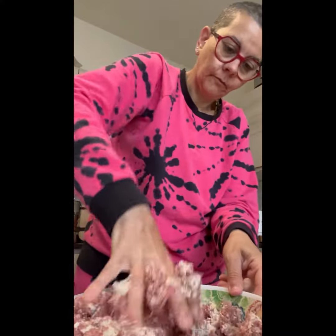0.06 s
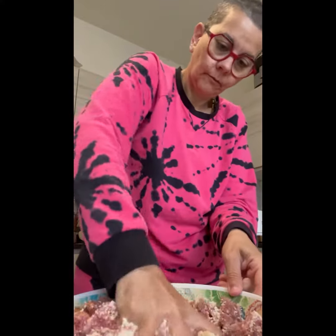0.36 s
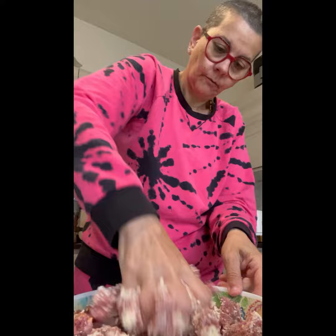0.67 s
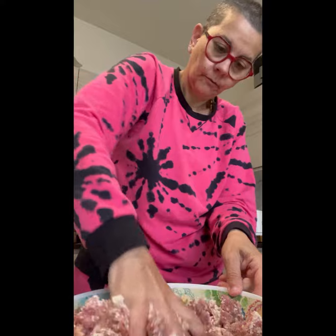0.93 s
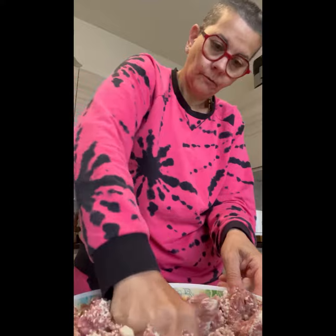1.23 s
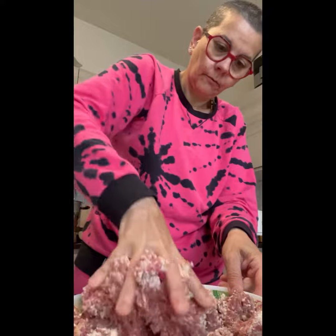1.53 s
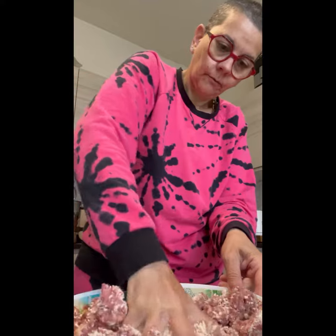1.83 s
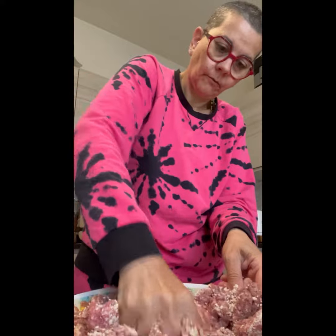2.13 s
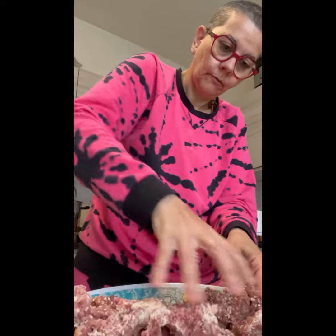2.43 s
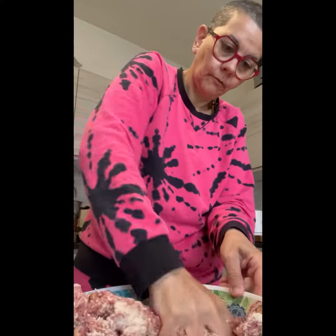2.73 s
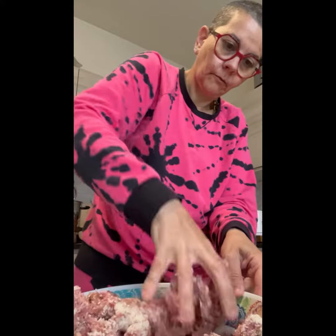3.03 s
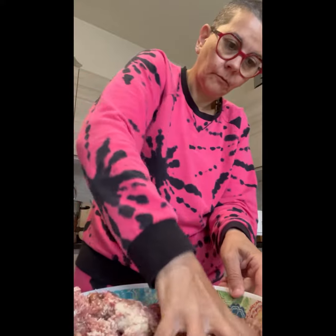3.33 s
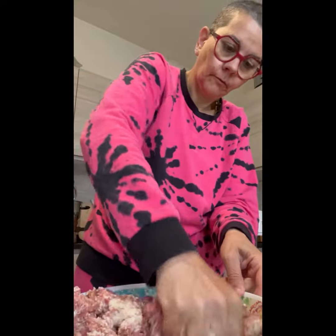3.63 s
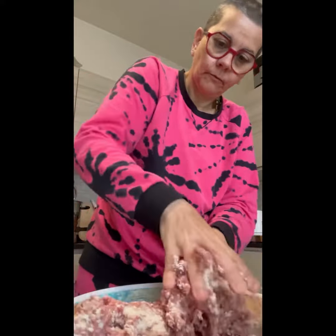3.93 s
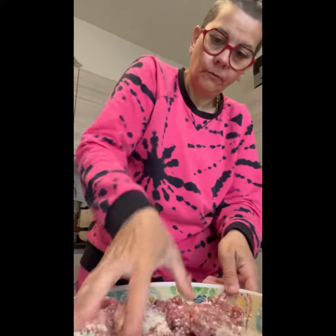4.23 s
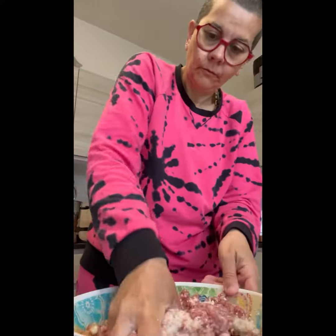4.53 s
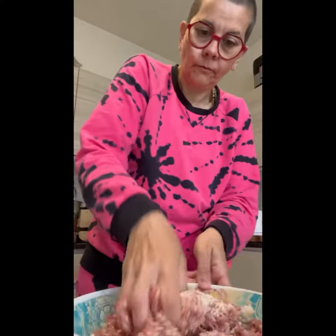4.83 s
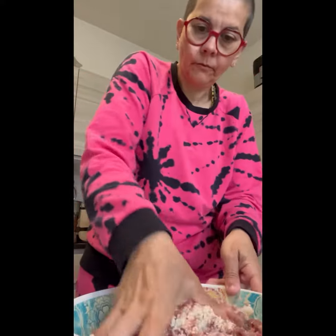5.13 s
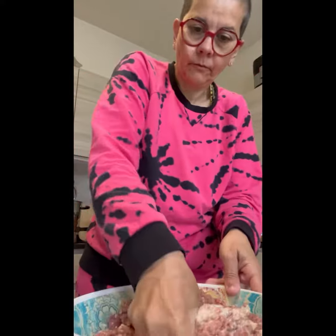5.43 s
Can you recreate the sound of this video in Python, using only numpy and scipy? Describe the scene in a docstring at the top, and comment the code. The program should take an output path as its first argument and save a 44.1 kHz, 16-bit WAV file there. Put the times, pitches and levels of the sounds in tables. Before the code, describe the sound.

A hand kneads wet minced meat in a bowl close to the microphone, over a steady low kitchen hum. The strokes begin at about 0.1, 0.9, 1.7, 2.5, 3.2, 4.2 and 5 seconds, each lasting roughly half a second. Each is a soft, low squelch with a sticky crackle and fine fizz that fades as the hand lifts. Small air pockets pop throughout, with a sharper snap at about 4.2 seconds and a cluster around 5.5. The meat falls back with soft, dull thuds, clearest near 2.9, 3.8 and 5 seconds. At about 4.8 seconds the bowl knocks hard on the counter, the loudest sound, with a brief rattle and a buzz of its rim. The kneading continues to about 5.6 seconds while a faint appliance whine swells behind it. The room adds only a slight, short echo.

```python
"""A kitchen counter, a phone's two microphone ports close to a bowl of wet minced meat.
Over the room's steady hum a hand kneads, each squeeze bursting thousands of tiny wet films.
Air pockets pop, the mass thuds back down, and the meat squishes stickily as it peels away.
Near 4.8 s the bowl knocks hard on the counter, its rim buzzing; a faint whine swells late on."""
import sys
import numpy as np
from scipy import signal
from scipy.fft import rfft, irfft
from scipy.io import wavfile
from scipy.ndimage import uniform_filter1d

SR = 44100
rng = np.random.default_rng(int(sys.argv[2]) if len(sys.argv) > 2 else 0)


def generate_wav(signal):
    """Clip the signal to [-1, 1] and save it as 16-bit WAV at the path in sys.argv[1]."""
    frames = np.transpose(np.atleast_2d(signal))
    scaled = np.clip(frames, -1, 1) * 32767
    pcm = np.round(scaled).astype(np.int16)
    wavfile.write(sys.argv[1], SR, pcm)


N = 250614
EDGE_HZ = 15900  # top of the microphone's band

# The kneading strokes. Each row: touch and lift of the hand in seconds; squeezing, peeling and
# smearing levels in dB; centre and half length in seconds and level in dB of a swell of fizz,
# heard only where it overlaps the stroke.
STROKES = [(-0.6, -0.1, -60, -65, -60, 0.5, .12, -59), (0.12, 0.636, -61, -61.5, -57, .63, 0.049, -59.5),
           (0.878, 1.362, -58, -61, -57, 0.6, 0.071, -51.5),
           (1.658, 2.167, -58.5, -60, -61.5, 2, 0.081, -53.5),
           (2.514, 2.891, -59, -56, -57, 3, 0.098, -51.5), (3.228, 3.888, -57.5, -57, -64, 4, 0.41, -49.5),
           (4.232, 4.788, -57.5, -53.5, -54.5, 5, 0.22, -47),
           (5.03, 5.63, -58, -60.5, -64.5, 5.56, 0.2, -49.5)]


def gain_of(db):
    """Decibels to amplitude."""
    return 10 ** (np.asarray(db) / 20)


def unit_rms(x):
    """Scales to rms 1."""
    return x / np.sqrt(np.mean(x ** 2) + 1e-20)


def curve_at(points, hz):
    """Reads a curve on a log-frequency axis."""
    point_hz, value = np.transpose(points)
    return np.interp(np.log(hz + 1), np.log(point_hz + 1), value)


def add(mix, start_s, sound):
    """Mixes a sound in at start_s."""
    part = mix[round(start_s * SR):][:len(sound)]
    part += sound[:len(part)]


def delayed(x, delay_s):
    """Delays a sound, by fractions of a sample too."""
    return np.interp(np.arange(N) - delay_s * SR, np.arange(N), x, left=0)


def colour(x, spectrum):
    """Filters by a spectrum in dB."""
    return irfft(rfft(x) * gain_of(curve_at(spectrum, np.fft.rfftfreq(N, 1 / SR))), N)


def widen(pair):
    """Mid and side become left and right, nearly alike in the bass."""
    # How much the two ports differ. Each row: frequency in Hz, side gain in dB.
    side_spectrum = [(60, -23.5), (200, -17), (400, -7), (700, 0.5), (1300, -3.5), (3000, -6), (6000, -5),
                     (9000, -61), (15000, -18)]
    side = colour(pair[1], side_spectrum)
    return np.array([pair[0] + side, pair[0] - side])


def kitchen_hum(level_db=-56, waver_hz=5):
    """Behind the bowl, the kitchen's steady low noise and the wavering whines of an appliance."""
    # The hum's colour. Each row: frequency in Hz, relative level in dB.
    hum_spectrum = [(20, -24), (45, 3.5), (130, -4.5), (175, -8), (245, 0), (400, -12.5), (620, -16.5),
                    (1000, -16.5), (1350, -26.5), (1850, -35.5), (2350, -24), (2900, -36.5), (7000, -47),
                    (15500, -60)]
    # Faint whines. Each row: pitch in Hz, level in dB.
    whines = [(340, -70.5), (740, -77.5), (2262, -81)]
    t = np.arange(N) / SR
    noise = widen(unit_rms(colour(rng.standard_normal((2, N)), hum_spectrum)))
    waver = unit_rms(uniform_filter1d(rng.standard_normal(N), SR // 20))
    drift_cycles = waver_hz * np.cumsum(waver) / SR
    swell_db = np.interp(t, [0, 1.2, 4.1, 5], [-97, -69, -82, -62.5])
    tones = list(whines) + [(944, swell_db)]  # the clearest whine swells late on
    whine = sum(gain_of(db) * unit_rms(np.sin(2 * np.pi * (hz * t + drift_cycles))) for hz, db in tones)
    return gain_of(level_db) * noise + whine


def crackle(per_s, spread_db, cycles, clump_db, patch_db=0, pitches=32):
    """Tiny films burst in clumps; each rings briefly at its own pitch and place."""
    clumps = unit_rms(uniform_filter1d(uniform_filter1d(rng.standard_normal(N), 600), 200))
    bursts = (rng.random(N) < per_s / SR) * rng.choice([-1, 1], N)
    place = rng.standard_normal(N)
    pitch_index = rng.integers(0, pitches, N)
    # every 25 ms, each group of four neighbouring pitches takes a new level
    patches = rng.standard_normal((N // 1100 + 1, pitches))[np.arange(N) // 1100, pitch_index // 4]
    sizes = np.minimum(rng.exponential(1, N), 3.5)
    bursts = bursts * gain_of(spread_db * sizes + clump_db * clumps + patch_db * patches)
    mid_side = np.zeros((2, N))
    for k, hz in enumerate(np.geomspace(250, 15000, pitches)):
        clicks = bursts * (pitch_index == k)
        film = signal.iirpeak(hz, cycles, SR)
        mid_side += signal.lfilter(*film, np.array([clicks, clicks * place]) + 1e-12)
    return mid_side


def crest(age, rise_s, rise_db, fall_db_per_s):
    """A level in dB that climbs to 0 and then sinks steadily."""
    return -rise_db * np.maximum(1 - age / rise_s, 0) - fall_db_per_s * np.maximum(age - rise_s, 0)


def hand_efforts(touch_db_per_s=407, squeeze_off_db_per_s=94, peel_off_db_per_s=106):
    """Gains of squeezing, peeling and smearing over time; contact is made quickly and lost slowly."""
    stretch_s, stretch_db = 0.16, 21.5
    cling_peel_db, cling_smear_db, cling_db_per_s = -70.5, -68.5, 39
    t, gains = np.arange(N) / SR, np.zeros((3, N))
    for touch, lift, squeeze_db, peel_db, smear_db, swell_at, swell_s, swell_db in STROKES:
        early, late = np.maximum(touch - t, 0), np.maximum(t - lift, 0)
        age = np.clip(t - touch, 0, lift - touch)
        # the fingers sink in, then the mass yields
        sink_db = crest(age, rise_s=0.15, rise_db=8, fall_db_per_s=23.5)
        squeeze = squeeze_db + sink_db - squeeze_off_db_per_s * late
        # the sticky crackle builds from the touch until the hand lifts
        grip_db = crest(age, rise_s=0.64, rise_db=3.5, fall_db_per_s=2)
        peel = peel_db + grip_db - peel_off_db_per_s * late
        fizz_swell = gain_of(swell_db) * np.exp(-.5 * ((t - swell_at) / swell_s) ** 2)
        smear = 20 * np.log10(np.hypot(gain_of(smear_db), fizz_swell))
        # films stretch as the hand lifts, then give way faster and faster
        smear -= stretch_db * (late / stretch_s) ** 2
        # meat clinging to the lifted hand still crackles, dying away
        peel = np.maximum(peel, cling_peel_db - cling_db_per_s * late)
        smear = np.maximum(smear, cling_smear_db - cling_db_per_s * late)
        gains = np.maximum(gains, gain_of(np.array([squeeze, peel, smear]) - touch_db_per_s * early))
    return gains


def kneading():
    """Squeezing gives a low squelch, peeling a sticky crackle, smearing a fine fizz."""
    # The colours of the three wet grains. Each row: frequency in Hz, relative level in dB.
    squeeze_spectrum = [(60, 3), (130, 14), (230, 5.5), (400, 2), (650, -4), (1150, 1.5), (1800, -8.5),
                        (2400, -2.5), (3200, -27), (6000, -65)]
    peel_spectrum = [(1200, -36), (1900, -9), (2200, 3.5), (2500, 4.5), (3050, 1.5), (3900, 2), (5100, -6),
                     (8000, -14), (15000, -42)]
    smear_spectrum = [(1200, -1.5), (1800, -5), (2400, 0.5), (3500, 1), (5000, -0.5), (6600, 1.5),
                      (8200, -4.5), (10500, -1), (13000, -5), (15500, -2.5)]
    squeeze, peel, smear = hand_efforts()
    squelch = crackle(per_s=3800, spread_db=2, cycles=5.2, clump_db=2.5, patch_db=2)
    sticky = crackle(per_s=3500, spread_db=1.5, cycles=3.9, clump_db=2.5, patch_db=2)
    fizz = crackle(per_s=12000, spread_db=2, cycles=1, clump_db=2)
    return widen(gain_of(3.5) * squeeze * unit_rms(colour(squelch, squeeze_spectrum))
                 + peel * unit_rms(colour(sticky, peel_spectrum))
                 + gain_of(-3.5) * smear * unit_rms(colour(fizz, smear_spectrum)))


def finger_ticks(level_db=-82):
    """Stray films snap faintly on the fingers, even while the hand is lifted."""
    snaps = crackle(per_s=60, spread_db=2, cycles=1, clump_db=0)
    bright = signal.sosfilt(signal.butter(2, 6000, "high", fs=SR, output="sos"), snaps)
    return gain_of(level_db) * widen(unit_rms(bright))


def air_pops(snap=0.43, snap_ms=0.072, pitch_rise=0.011, spray_db=-14, spray_s=0.0009, tear_s=0.00006):
    """An air pocket snaps open, spits a tiny spray and rings briefly; the bowl's wall echoes it."""
    # The larger pockets. Each row: start in seconds, level in dB, pitch in Hz, ring time in ms.
    large_pops = [(.113, -47, 3500, 0.38), (.1245, -45, 4050, 0.52), (.144, -43.5, 3420, .5),
                  (.162, -34.5, 3120, 0.53), (.239, -39, 2100, 0.26), (.458, -41, 1130, 0.63),
                  (.48, -38, 1400, .3), (.6495, -38.5, 3200, 0.45), (.9275, -41, 990, 0.36),
                  (.9275, -39, 2700, 0.33), (.995, -37.5, 2500, 0.15), (1.074, -41, 1110, 1.1),
                  (1.134, -39, 3730, 0.79), (1.211, -35.5, 1000, 0.39), (1.211, -37.5, 3980, 0.38),
                  (1.479, -44.5, 5140, 0.16), (1.548, -48, 3940, .27), (1.642, -43.5, 5630, 0.49),
                  (1.843, -30.5, 1480, 0.26), (1.847, -34, 930, 0.48), (1.873, -34, 2400, 0.5),
                  (2.2845, -34.5, 2460, 0.73), (2.415, -36.5, 3260, 0.82), (2.480, -44, 3100, .4),
                  (2.626, -41, 1194, 2), (2.651, -42, 5100, 0.7), (2.688, -42, 2350, 0.39),
                  (2.761, -42, 1100, 0.46), (2.836, -41, 1280, 0.86), (2.916, -42.5, 1330, 1),
                  (3.1773, -46, 4800, 0.27), (3.178, -32.5, 3270, .8), (3.445, -49, 1090, 2.4),
                  (3.6115, -38, 3000, 0.33), (3.613, -42.5, 1010, 0.64), (3.630, -34, 6600, 0.22),
                  (3.884, -35, 3010, 0.57), (3.896, -32, 3460, 0.25), (3.977, -41, 5900, .15),
                  (4.1127, -37.5, 1690, 0.23), (4.2015, -41, 2670, 0.82), (4.211, -44, 3900, 0.71),
                  (4.2335, -20.5, 3970, 0.48), (4.234, -29.5, 1410, 0.19), (4.284, -37, 9000, 0.25),
                  (4.4845, -34, 3840, 1.25), (5.090, -37.5, 5170, 0.26), (5.155, -37, 10000, 0.39),
                  (5.2555, -35.5, 4060, 0.53), (5.2555, -38, 8300, .25), (5.435, -34, 1370, 1.2),
                  (5.435, -36.5, 3700, 0.4), (5.4445, -30.5, 1180, 0.72), (5.445, -29, 3480, 0.39),
                  (5.445, -28.5, 9900, 0.28), (5.46, -34, 4130, 0.4), (5.607, -32, 4380, 0.55),
                  (5.632, -33, 970, 0.5), (5.632, -34, 2970, 0.32), (5.632, -26, 6540, 0.17)]
    out, t = np.zeros(N), np.arange(900) / SR
    tear = t / tear_s - 4
    click = (1 - 2 * tear ** 2) * np.exp(-tear ** 2)
    spray_swell = t / spray_s * np.exp(1 - t / spray_s)
    pockets = list(large_pops) + small_pops()
    for (start, db, hz, ring_ms), noise in zip(pockets, rng.standard_normal((400, len(t)))):
        age = t / (ring_ms / 1000)
        phase = 2 * np.pi * np.cumsum(hz * (1 + pitch_rise * np.tanh(age - 1))) / SR
        envelope = np.exp(-age) * (1 - np.exp(-2 * age)) ** 2
        ring = envelope / envelope.max() * np.sin(phase)
        band = signal.butter(2, [.9 * hz, min(2.4 * hz, EDGE_HZ)], "band", fs=SR)
        spray = gain_of(spray_db) * unit_rms(signal.lfilter(*band, noise)) * spray_swell
        click_gain = snap * np.exp(-ring_ms / snap_ms)  # shorter pops click more
        add(out, start, gain_of(db) * (ring + spray + click_gain * click))
    return out + gain_of(-19) * delayed(out, 0.002)


def small_pops(per_s=45, above_db=14, spread_db=2.5, hz=2400, octaves=0.71, ring_ms=0.33, count=300):
    """Rows of small pockets bursting at random under the hand, louder the harder it squeezes."""
    rows, squeeze = [], hand_efforts()[0]
    starts = rng.exponential(1, count).cumsum() / per_s
    scatter = np.clip(rng.standard_normal((count, 2)), -2, 2)
    for start, (size, pitch) in zip(starts, scatter):
        if any(touch < start < lift for touch, lift, *_ in STROKES):
            squeeze_db = 20 * np.log10(squeeze[min(round(start * SR), N - 1)])
            ratio = 2 ** (octaves * pitch)  # low ones ring longer
            rows.append((start, squeeze_db + above_db + spread_db * size, hz * ratio, ring_ms / ratio))
    return rows


def dead_blow(db, hz, swell_ms, sag, sag_s, lumps=0):
    """A thump that swells, dies, and sinks to its pitch as more of the mass makes contact."""
    t = np.arange(SR // 5) / SR
    age = t / (swell_ms / 1000)
    pitch_hz = hz * (1 + sag * np.exp(-t / sag_s))
    push = np.sin(2 * np.pi * np.cumsum(pitch_hz) / SR)
    return gain_of(db) * age * np.exp(1 - age) * (push + lumps)


def meat_thuds(lumpiness=0.3, lumps_hz=(70, 340)):
    """Soft, lumpy meat lands in the bowl."""
    # Each row: start in seconds, level in dB, final pitch in Hz, swell in ms,
    # pitch sag in multiples of the final pitch.
    landings = [(0.211, -41, 52.4, 16, .35), (0.925, -44, 59, 12, 3.2), (1.678, -44.5, 48.3, 17, 4.5),
                (2.488, -38.5, 80, 8.5, .4), (2.9062, -31, 65.4, 7.1, 2.6), (3.1935, -38, 44.3, 11.3, 4.2),
                (3.737, -39.5, 100.4, 11, .1), (3.7776, -35, 88, 6.7, .3), (4.2328, -38, 96, 6.7, .1),
                (5.04, -30, 91.7, 14.5, 1.2), (5.612, -39, 58, 8, 3)]
    out = np.zeros(N)
    band = signal.butter(2, lumps_hz, "band", fs=SR, output="sos")
    for (start, *blow), noise in zip(landings, rng.standard_normal((len(landings), SR // 5))):
        lumps = lumpiness * unit_rms(signal.sosfilt(band, noise))
        add(out, start, dead_blow(*blow, sag_s=0.00754, lumps=lumps))
    return out


def resonate(x, hz, width_hz):
    """A resonance that follows the curve hz."""
    turn = np.exp(2j * np.pi * np.cumsum(hz) / SR)
    pole = np.exp(-np.pi * width_hz / SR)
    return 2 * (turn * signal.lfilter([1 - pole], [1, -pole], x / turn)).real


def squishes_and_rim_buzz(slip_threshold=2400 / SR, rise_share=0.32):
    """Quick slips ring a gliding resonance: a small air cavity in peeling meat, or once the bowl's rim."""
    # Sticky squishes, and the bowl's rim buzzing briefly as it lands near 4.8 s. Each row: start and
    # length in seconds, level in dB, pitch in Hz, glide in octaves, sharpness as Q.
    events = [(0.23, 0.05, -57.5, 2560, 0.0022, 4.6), (0.368, 0.047, -54.5, 1080, 0.6, 2),
              (0.945, 0.085, -57, 2560, -0.1, 14), (1.037, 0.14, -56.5, 1240, .2, 2),
              (1.341, .07, -55.5, 3930, -0.057, 1.9), (1.771, 0.19, -57, 866, 0.4, 1.3),
              (1.884, 0.15, -54.5, 2550, 0.48, 1.9), (3.222, 0.055, -58, 910, 0.2, 6.1),
              (3.367, 0.04, -54, 2280, -0.81, 4.3), (3.371, 0.042, -53.5, 1270, -0.27, 5.1),
              (3.892, 0.077, -53.5, 2600, -0.5, 7), (4.232, 0.028, -50.5, 3680, -0.3, 6.6),
              (4.796, 0.035, -39, 2210, -0.1, 2.8), (5.047, 0.041, -49.5, 3180, -0.57, 12),
              (5.097, 0.032, -53, 3170, -0.1, 6.5), (5.15, 0.09, -51.5, 3060, -0.063, 7.7),
              (5.442, 0.063, -48.5, 2290, -0.075, 7.5)]
    mid_side = np.zeros((2, N))
    for start, length, db, hz, glide, q in events:
        noise = rng.standard_normal((3, SR // 5))
        progress = np.linspace(0, 1, int(length * SR))
        slips = noise[:2] * (abs(noise[2]) < slip_threshold) + 1e-9
        jerks = np.diff(slips, prepend=0)[:, :len(progress)]
        pitch_hz, width_hz = hz * 2 ** (glide * (progress - .5)), 2 * hz / q
        ring = unit_rms(resonate(resonate(jerks, pitch_hz, width_hz), pitch_hz, width_hz))
        swell = np.sqrt(np.interp(progress, [0, rise_share, 1], [0, 1, 0]))
        for channel, sound in zip(mid_side, ring):
            add(channel, start, gain_of(db) * swell * sound)
    return widen(mid_side)


def bowl_knock():
    """The tipped bowl drops on the counter with one heavy thump; its foot rattles, the meat damps it."""
    # The bowl's modes. Each row: frequency in Hz, level in dB, seconds to fall 60 dB.
    modes = [(58, -10.5, .1), (135, -15.5, 0.053), (195.4, -26.5, 0.34), (220.8, -26.5, 0.45),
             (391, -16, 0.033), (404, -32.5, .2), (568, -10.5, .03), (580, -38, 0.19), (843, -20, 0.034),
             (1222, -17.5, 0.025), (1370, -18, 0.016), (2243, -24, 0.053), (2450, -44, 0.19)]
    # The foot's contacts. Each row: start in seconds, gain in dB, hardness as a cut-off in Hz.
    contacts = [(4.8, -16, 700), (4.8083, -3, 2450), (4.8128, -13.5, 2600), (4.8189, -8.5, 1000),
                (4.840, -14, 800), (4.848, -16, 650), (4.857, -13, 400)]
    out, t = np.zeros(N), np.arange(SR // 2) / SR
    ring = sum(gain_of(db - 60 * t / t60) * np.sin(2 * np.pi * hz * t) for hz, db, t60 in modes)
    for start, db, cutoff_hz in contacts:
        add(out, start, -gain_of(db) * signal.lfilter(*signal.butter(2, cutoff_hz, fs=SR), ring))
    full_weight = dead_blow(db=-3.5, hz=196, swell_ms=2.8, sag=5.37, sag_s=0.0011)
    add(out, 4.8097, full_weight)
    return out


def kitchen_reverb(x, build_s=0.00067):
    """Dense reflections from counter and walls, each band dying at its own speed."""
    # The room's decay. Each row: frequency in Hz, seconds to fall 60 dB.
    decay_times = [(100, 0.33), (260, 0.4), (700, 0.4), (2000, 0.39), (8000, 0.17)]
    reflections = rng.standard_normal((2, SR // 2)) * (rng.random((2, SR // 2)) < .1)
    hz, t, bands = signal.stft(reflections, SR, nperseg=256)
    envelope = gain_of(-60 * t / curve_at(decay_times, hz)[:, None]) * (1 - np.exp(-t / build_s))
    tail = signal.istft(bands * envelope, SR, nperseg=256)[1]
    tail /= np.linalg.norm(tail[0])
    return widen(signal.fftconvolve(x[None], tail, axes=1)[:, :N])


def scene(far_wall_s=0.00082):
    """The bowl stands close to the microphone, straight ahead; the room answers faintly."""
    wet = kneading() + squishes_and_rim_buzz() + finger_ticks()
    pops, thuds, knock = air_pops(), meat_thuds(), bowl_knock()
    to_room = (gain_of(-10) * wet.mean(0) + gain_of(-9.5) * pops
               + gain_of(-6.5) * thuds + gain_of(-12.5) * knock)
    far_wall = gain_of(-8) * delayed(knock, far_wall_s)  # the bowl's far wall sounds a moment later
    return wet + pops + thuds + widen([knock, far_wall]) + kitchen_reverb(to_room) + kitchen_hum()


def record(dry, low_cut_hz=32):
    """The phone's two ports hear the treble out of step; then the low cut and the band limit."""
    # Phase between the ports. Each row: frequency in Hz, lead of the left port in radians.
    port_phase = [(0, 0), (1500, 0), (4200, .3), (5200, 1.1), (6700, 1.5), (7800, 2.6), (9200, 3.14),
                  (10200, 3.6), (11500, 5.1), (12500, 6.2), (16000, 6.28)]
    lead = curve_at(port_phase, np.fft.rfftfreq(N, 1 / SR))
    heard = irfft(rfft(dry) * np.exp(.5j * np.array([lead, -lead])), N)
    heard = signal.sosfilt(signal.butter(3, low_cut_hz, "high", fs=SR, output="sos"), heard)
    band_limit = signal.firwin(511, EDGE_HZ, window=("kaiser", 9), fs=SR)
    return signal.oaconvolve(heard, band_limit[None], "same")


dry = scene()
out = record(dry)
generate_wav(out)
```